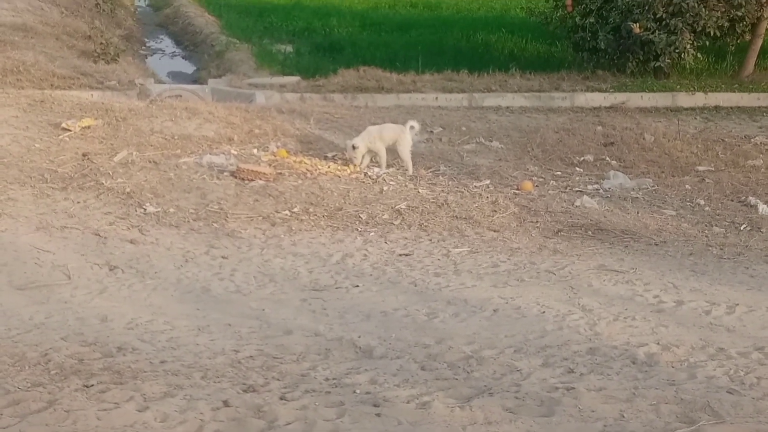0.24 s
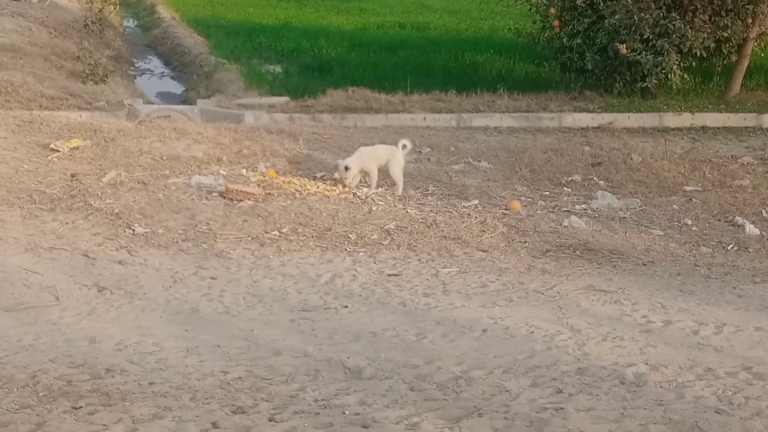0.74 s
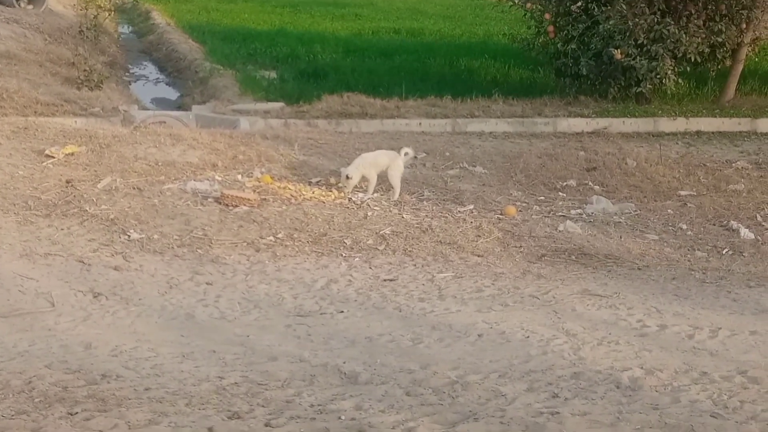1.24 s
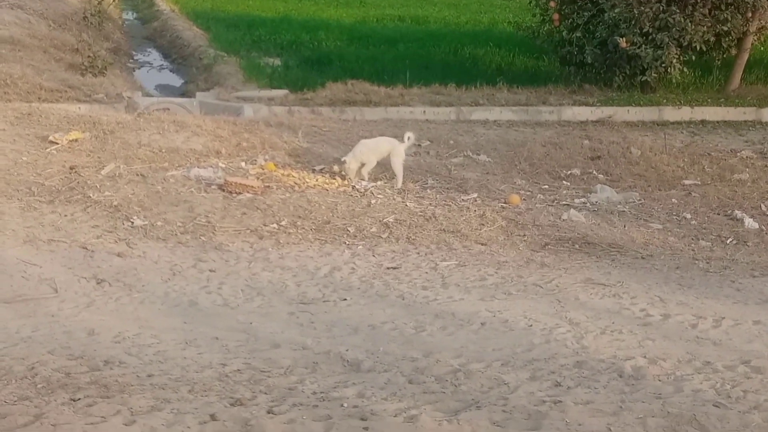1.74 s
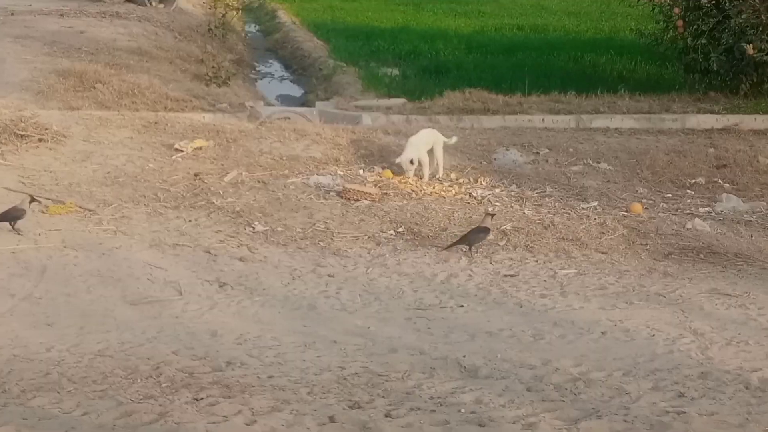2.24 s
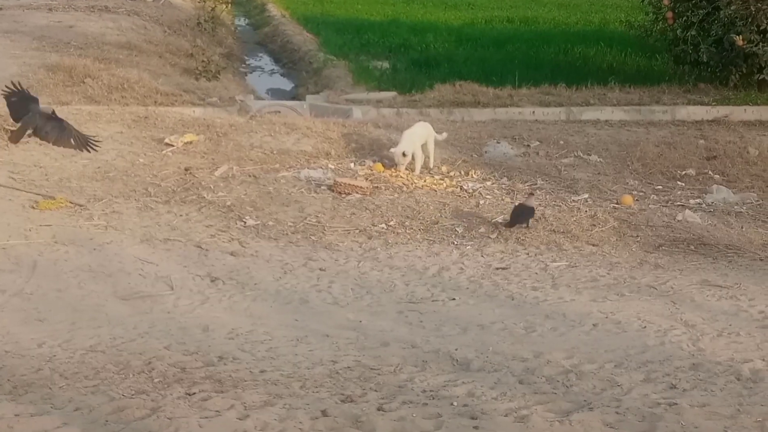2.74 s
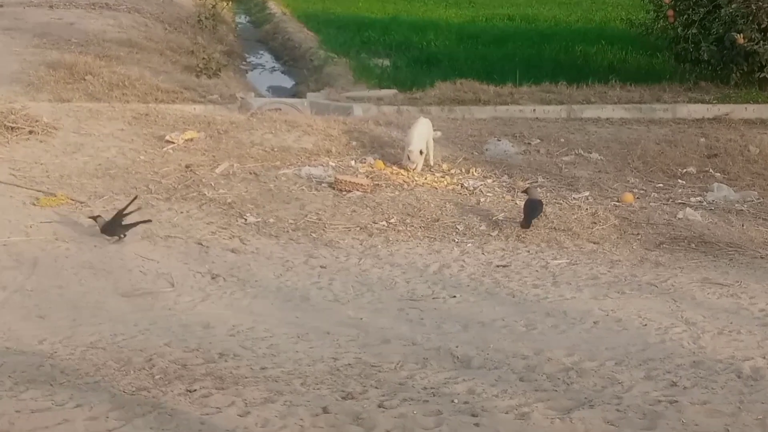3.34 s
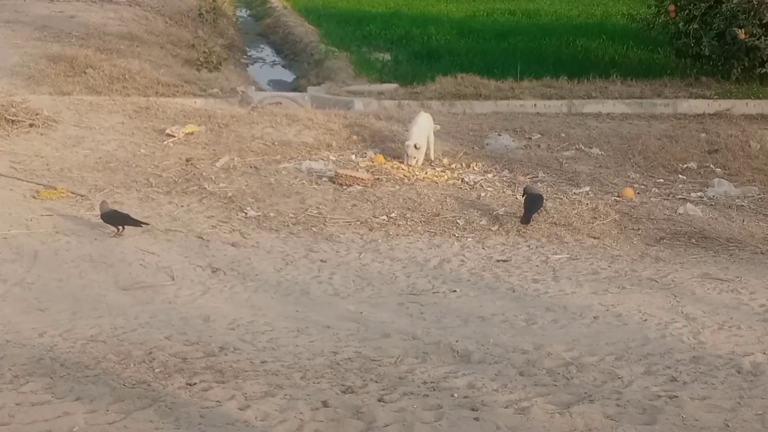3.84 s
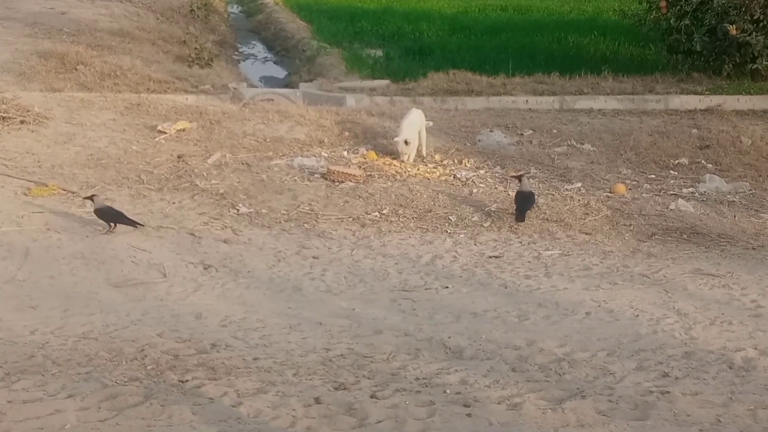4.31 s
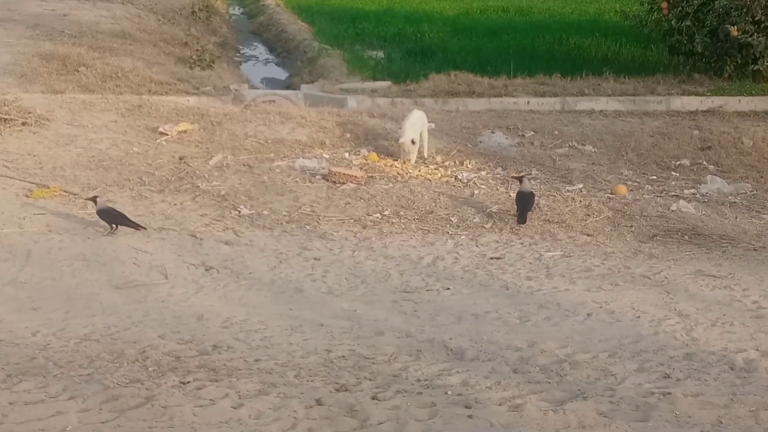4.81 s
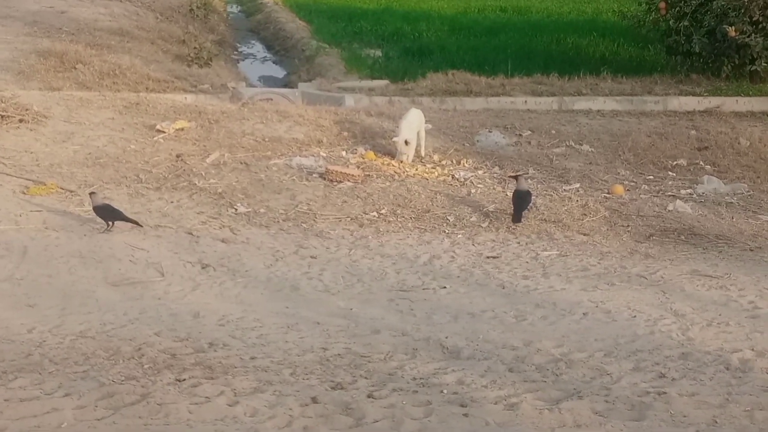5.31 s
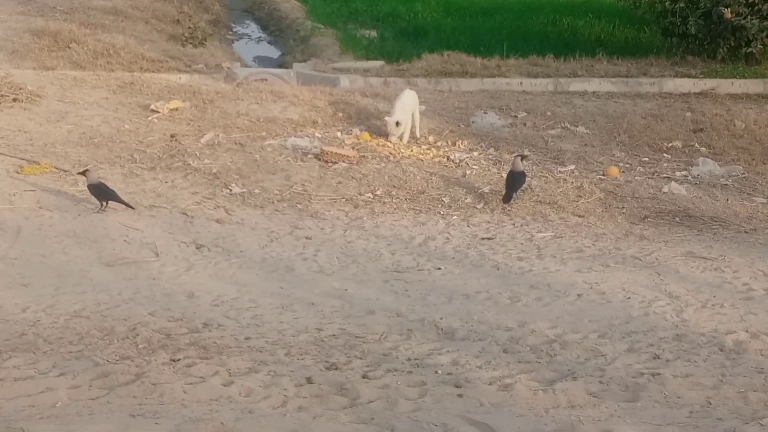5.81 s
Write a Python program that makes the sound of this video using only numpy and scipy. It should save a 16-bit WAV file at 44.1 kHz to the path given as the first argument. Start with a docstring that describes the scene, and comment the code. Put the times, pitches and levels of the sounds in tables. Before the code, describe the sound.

Handheld outdoor microphone near a field. A one-cylinder pump engine beats rapidly in the distance under unsteady airy hiss, with quick bright chirps, faint crows and a rough near caw. A second near caw stops abruptly at two seconds as the background jumps. Afterwards come dry ticks, soft wing flutters, faraway caws, a continuous fast trill, short harsh squawks and warbles, with low wind thuds strongest from three to about four and a half seconds.

```python
"""Distant crows caw and small birds chirp over an engine's thump and clank; soon a crow caws close by.
After two seconds the scene jumps to a later moment, cutting a close caw short: gusts buffet the
microphone and a thin trill sets in. Rattling membrane pulses through resonances make the caws, gliding
sine tones the chirps, warbles and trills, filtered clicks and noise bursts the one-cylinder pump engine,
and shaped noise the wind, the open air, breathy hiss, a low growl, wing beats, scuffs and ticks."""
import sys
import numpy as np
from scipy import signal
from scipy.fft import rfft, irfft, next_fast_len
from scipy.io import wavfile
from scipy.ndimage import uniform_filter1d

SR = 44100
rng = np.random.default_rng(int(sys.argv[2]) if len(sys.argv) > 2 else 0)


def transcribe(signal):
    """Save signal, clipped to [-1, 1], as a 16-bit WAV file at the path in sys.argv[1]."""
    frames = np.atleast_2d(signal).T
    limited = np.clip(frames, -1, 1)
    pcm = np.round(limited * 32767).astype(np.int16)
    wavfile.write(sys.argv[1], SR, pcm)


N = 267246
T = np.arange(N) / SR   # seconds
JUMP_S = 2.044   # the later moment begins
BIRD_T60_S = .17   # the scattered tail of the small birds falls by 60 dB in this time
NEAR_TREMOR, FAR_TREMOR = .015, .03   # random pitch wander of near and far chirps, as a share of the pitch


def from_db(db):
    """Amplitude gain is ten to the power of a twentieth of the decibels."""
    return 10 ** (np.asarray(db) / 20)


def rms_one(x):
    """Normalization: dividing by the root mean square gives unit power."""
    return x / np.sqrt(np.mean(x ** 2) + 1e-20)


def along(rows, t):
    """Linear interpolation: the columns of a curve table at times t."""
    s, *columns = np.transpose(rows)
    return [np.interp(t, s, c) for c in columns]


def span(start, end):
    """Sampling: the indices between two times in seconds."""
    return np.arange(max(int(start * SR), 0), min(int(end * SR), N))


def colour(x, points):
    """Spectral shaping: multiply the spectrum by a curve of (Hz, dB) points, then set unit power."""
    size = next_fast_len(len(x) + 2048)
    hz, db = np.transpose(points)
    f = np.arange(size // 2 + 1) * SR / size + 1
    skirts = np.minimum(f / hz[0], 1) ** 2 * np.minimum(hz[-1] / f, 1) ** 2   # 12 dB an octave
    curve = from_db(np.interp(np.log(f), np.log(hz), db))
    shaped = irfft(rfft(x, size) * skirts * curve, size)
    return rms_one(shaped[:len(x)])


def drift(t, rate):
    """Band-limited randomness: straight lines join about rate random values a second."""
    knots = rng.standard_normal(int((t[-1] - t[0]) * rate) + 2)
    return np.interp((t - t[0]) * rate, np.arange(len(knots)), knots)


def resonate(x, hz, width_hz):
    """Resonance: a pole pair rings near hz with about unit gain at its peak."""
    r = np.exp(-np.pi * width_hz / SR)
    zeros = np.array([1, 0, -1]) * (1 - r * r) / 2
    poles = [1, -2 * r * np.cos(2 * np.pi * hz / SR), r * r]
    return signal.lfilter(zeros, poles, x + 1e-18)


def delayed(x, s):
    """Propagation delay: the same sound s seconds later."""
    return np.interp(T - s, T, x, left=0)


def fade(t, edge_s):
    """Windowing: smooth edges of edge_s open and close a sound."""
    return np.sin(np.pi / 2 * np.clip(np.minimum(t - t[0], t[-1] - t) / edge_s, 0, 1)) ** 2


def effort(t, peak_share):
    """Breath effort: an arch from 0 to 1 and back, highest at peak_share of the way."""
    peak_s = t[0] + np.clip(peak_share, .05, .95) * (t[-1] - t[0])
    u = np.interp(t, [t[0], peak_s, t[-1]], [-1, 0, 1])
    return 1 - u ** 2


def syrinx(t, pitch_hz, jitter, rasp, rattle_db, lurch):
    """Subharmonics: membrane pulses lurch and swell in a five-cycle rattle, with turbulence in each opening."""
    cycles = np.cumsum(pitch_hz * (1 + jitter * drift(t, 150))) / SR
    turn = 2 * np.pi * cycles / 5
    cycles = cycles + np.clip(lurch, 0, .7) * np.sin(turn + drift(t, 6))
    pulses = rms_one(np.diff(np.floor(cycles), prepend=np.floor(cycles[0])))
    opening = 1 + np.cos(2 * np.pi * cycles)
    turbulence = rms_one(rng.standard_normal(len(t)) * opening)
    rattle = from_db(rattle_db * (np.cos(turn) + 0.2 * drift(t, 200)))
    return (pulses + rasp * turbulence) * rattle


def whistle(t, hz, tremor=.014, flicker_db=2.06):
    """Frequency modulation: a sine follows hz with a slight tremor while its level flickers."""
    turns = np.cumsum(hz * (1 + tremor * drift(t, 700))) / SR
    flicker = from_db(flicker_db * drift(t, 400))
    return np.sqrt(2) * np.sin(2 * np.pi * turns) * flicker * fade(t, 0.00067)


def outdoors(x, wet_db, t60):
    """Diffuse scattering: trees and banks return a short, exponentially dying tail."""
    t = T[:SR // 2]
    tail = rng.standard_normal(len(t)) * from_db(-60 * t / t60) * (t > .006)
    return x + from_db(wet_db) * signal.fftconvolve(x, tail / np.linalg.norm(tail))[:N]


def mottled(x, depth_db):
    """Random amplitude modulation: each narrow band swells and sinks several times a second."""
    _, _, bands = signal.stft(x, SR, nperseg=1024)
    swell = uniform_filter1d(rng.standard_normal(bands.shape), size=7, axis=1)   # smooth in time
    swell = uniform_filter1d(swell, size=4, axis=0)   # and across neighbouring bands
    return signal.istft(bands * from_db(depth_db * rms_one(swell)), SR)[1][:N]


def far_crows(sag=.24, beak_sag=.1, early_overtone_db=-3, late_overtone_db=-13):
    """Source and filter: distant caws keep mostly the beak resonance; pitch and beak sag toward the end."""
    # Distant caws. Each row: start in seconds, length in seconds, top pitch before the sag in Hz,
    # beak resonance midway through its sag in Hz, relative level in dB.
    distant_caws = [(.0, 0.45, 486, 1940, -60), (0.222, 0.35, 493.8, 1780, -54.5),
                    (1.272, 0.27, 397.6, 1950, -53), (1.962, 0.19, 501, 1760, -57.5),
                    (1.997, 0.15, 335, 1010, -68), (2.247, 0.13, 251.5, 955, -69),
                    (2.356, 0.29, 449.3, 1756, -56.5), (2.42, 0.4, 412, 820, -72),
                    (3.198, 0.33, 445.7, 1720, -63), (3.417, 0.26, 460.4, 1720, -61.5),
                    (3.885, 0.34, 469, 1790, -59), (4.303, 0.3, 413.6, 1520, -65.5),
                    (4.648, .19, 566.6, 1950, -58.5), (4.812, .22, 398, 1620, -58.5),
                    (5.164, 0.12, 440, 1730, -70), (5.44, 0.39, 432, 1680, -62),
                    (5.653, 0.19, 293.5, 1080, -65), (5.938, 0.14, 360.6, 1443, -65.5)]
    overtone_colour = [(700, -8.5), (1000, 8.5), (3200, 6.0), (4000, 2.5), (5200, 5), (7500, -14.5)]   # Hz, dB
    out = np.zeros(N)
    for start, length, pitch_hz, beak_hz, db in distant_caws:
        i = span(start, start + length)
        u = (T[i] - start) / length
        sagging_hz = pitch_hz * (1 - sag * (u - .15) ** 2)
        voice = syrinx(T[i], sagging_hz, jitter=.01, rasp=.12, rattle_db=2.8, lurch=.05)
        beak = rms_one(resonate(resonate(voice, beak_hz, 430), beak_hz, 560))
        overtones = colour(voice, overtone_colour)
        overtone_db = early_overtone_db if start + length < JUMP_S else late_overtone_db
        # a slowing pace lowers pitch and resonance together
        pace = 1 - beak_sag * (u ** 2 - np.mean(u ** 2))
        caw = np.interp(np.cumsum(pace), np.arange(len(i)), beak + from_db(overtone_db) * overtones)
        out[i] += caw * from_db(db) * fade(T[i], 0.26 * length)
    return out


def firings(offset_s, spread_db):
    """Periodic excitation: one click each engine cycle, offset_s from the firing, of varying strength."""
    cycle_s, early_firing_s, late_firing_s = .085, .048, 2.083   # one firing falls on each of the two times
    cycles = (T - np.where(T < JUMP_S, early_firing_s, late_firing_s) - offset_s) / cycle_s
    return (np.diff(cycles % 1, prepend=0) < -.5) * from_db(spread_db * drift(T, 31))


def engine(early_db=-51.5, late_db=-48, rumble_db=-56, late_rumble_db=-52, early_clank_db=-6):
    """Filtered impulses: dull exhaust beats over their own rumble, and ringing clanks in every cycle."""
    # Exhaust beat and the lesser puffs round it. Each row: seconds from firing, relative level in dB.
    thumps = [(-.022, 0), (-.01, -9.5), (0, 2.5), (.009, -1), (.021, -13.5)]
    # Clanks of the engine. Each row: seconds from firing, resonance in Hz, width in Hz, relative level in dB.
    clanks = [(-.029, 1602, 130, -70), (-.029, 1814, 130, -69), (-.011, 1700, 300, -70),
              (-.008, 1178, 90, -70)]
    rumble_colour = [(20, -32), (35, -11.5), (55, 1.5), (95, -2), (150, -7.5), (210, -32.0), (330, -31.0)]   # Hz, dB
    early = T < JUMP_S
    beats = sum(from_db(db) * firings(s, 2.8) for s, db in thumps)
    beats = signal.sosfilt(signal.butter(2, [62, 165], "band", fs=SR, output="sos"), beats)
    beats = rms_one(signal.sosfilt(signal.butter(6, 165, fs=SR, output="sos"), beats))
    rumble = colour(rng.standard_normal(N), rumble_colour)
    out = beats * from_db(np.where(early, early_db, late_db))
    out += rumble * from_db(np.where(early, rumble_db, late_rumble_db))
    for offset_s, hz, width_hz, db in clanks:
        # each click starts a noise burst with an 8.3 ms decay
        burst = signal.lfilter([1], [1, -np.exp(-1 / (0.0083 * SR))], firings(offset_s, 3.3) + 1e-18)
        chatter = burst * rng.standard_normal(N)
        clank = resonate(resonate(chatter, hz, width_hz), hz, 3 * width_hz)
        out += rms_one(clank) * from_db(db + np.where(early, early_clank_db, 0))
    return out


def air(early_murmur_db=0.5, late_murmur_db=3.0, early_hiss_db=5.0, late_hiss_db=0.0):
    """Broadband noise: the far murmur of the countryside and a hiss of leaves, both unsteady."""
    # Open air before the jump, in two stretches, and after it.
    # Each row: time in seconds, relative murmur level in dB, relative hiss level in dB.
    early_levels = [
        [(0.0, -65.5, -62), (0.182, -62, -62), (0.4, -64.5, -69.5)],
        [(0.88, -60, -63), (1.074, -69, -73.5), (1.686, -68, -70.5), (1.91, -63.5, -70), (2.03, -54.5, -66.5)],
    ]
    late_levels = [(2.08, -78.5, -79.5), (2.38, -70.5, -76), (2.71, -78.5, -65.5), (3.37, -74.5, -79.5),
                   (4.16, -72, -72.5), (4.68, -75, -74), (5.22, -75.5, -66), (5.65, -72.5, -69),
                   (6.06, -78.5, -71)]
    # Spectra of the murmur and of the hiss before and after the jump. Each row: frequency in Hz, level in dB.
    murmur_colour = [(250, -13), (500, 2), (800, 7), (1000, 2), (1300, 8), (1900, 7), (2700, -3.5),
                     (4000, -14.5)]
    early_hiss_colour = [(1500, -21), (3000, 3.5), (4500, 9.5), (6000, 6), (7500, 2.5), (9500, -4.5),
                         (12500, -27), (14000, -19.5), (15500, -11.5)]
    late_hiss_colour = [(1500, -27.5), (2800, 1.5), (3700, 10.5), (4700, 1), (6200, 6.5), (7500, -5),
                        (9500, -19.5), (13500, -22), (15300, -10.5)]
    murmur, hiss = along(np.vstack([*early_levels, late_levels]), T)
    early = colour(rng.standard_normal(N), early_hiss_colour) * from_db(early_hiss_db)
    late = colour(rng.standard_normal(N), late_hiss_colour) * from_db(late_hiss_db)
    leaves = np.where(T < JUMP_S, early, late) * from_db(hiss + 4.9 * drift(T, 40))
    murmur_db = murmur + np.where(T < JUMP_S, early_murmur_db, late_murmur_db)
    far = colour(rng.standard_normal(N), murmur_colour) * from_db(murmur_db + 2.8 * drift(T, 25))
    return mottled(leaves + far, depth_db=4.0)


def chirps(near_wet_db=-7.0, far_wet_db=0.0, far_loss_db=-3.0):
    """Gliding tones: chirps bend through three pitches, loudest in the middle; faint ones echo most."""
    # Whistled chirps. Each row: middle in seconds, length in seconds, start, middle and end pitch in Hz,
    # relative level in dB, second voice as a multiple of the pitch or 0 for none.
    chirp_rows = [(0.075, 0.028, 6070, 6320, 7360, -41.5, 0), (0.104, 0.05, 3470, 6050, 3720, -36.5, 0),
                  (0.188, 0.065, 3170, 4600, 5570, -48, 0), (.39, 0.037, 3750, 3200, 2750, -63, 0),
                  (0.912, 0.017, 5200, 5860, 6940, -42.5, 0), (0.933, 0.04, 3080, 4740, 3550, -38, 0),
                  (0.947, 0.032, 3590, 2546, 2640, -53, 0), (0.961, 0.017, 2940, 4480, 3200, -42, 0),
                  (1.003, 0.047, 3220, 4210, 2850, -44.5, 0), (1.175, 0.068, 3900, 3260, 3530, -56.5, 0),
                  (1.273, 0.043, 3570, 4320, 3450, -55, 0), (1.493, .016, 3830, 4070, 4500, -45, 0),
                  (1.512, .034, 4920, 5870, 4880, -30, 0), (1.534, 0.019, 5150, 4690, 4670, -36.5, 0),
                  (1.593, 0.071, 5130, 5150, 5260, -52.5, 0), (1.615, .08, 3800, 2800, 2430, -68, 0),
                  (1.87, .032, 3000, 4140, 2550, -48.5, 0), (1.888, .024, 2650, 2610, 2500, -52.5, 0),
                  (1.925, 0.053, 2165, 2214, 2200, -54.5, 0), (2.412, 0.071, 6820, 5760, 5110, -51.5, 1.14),
                  (2.847, .045, 2040, 2950, 4200, -68, 0), (2.973, .07, 4150, 3845, 3550, -61, 0),
                  (3.08, 0.066, 4250, 3940, 3710, -62, 0), (3.15, .04, 3950, 3670, 3460, -63.5, 0),
                  (3.319, 0.031, 7100, 6350, 5930, -51.5, 0), (3.438, 0.038, 8200, 6360, 4900, -49, 0),
                  (3.464, .032, 8100, 6430, 5550, -51, 0), (3.856, 0.02, 4170, 4400, 4400, -45, 0),
                  (3.885, 0.037, 4020, 3790, 2990, -39.5, 0), (3.91, .02, 3120, 3090, 3200, -48.5, 0),
                  (4.075, 0.17, 2750, 2550, 2400, -63.5, 0), (4.152, 0.038, 3440, 3320, 3170, -54.5, 0),
                  (4.211, 0.069, 5770, 6860, 5430, -54.5, 1.2), (4.44, .034, 4300, 3930, 3640, -64, 0),
                  (4.699, 0.033, 3920, 3620, 3180, -56, 0), (4.72, .14, 2900, 2300, 2030, -59.5, 0),
                  (5.19, .042, 3944, 3970, 3450, -41, 0), (5.2, 0.061, 3260, 3280, 2964, -44.5, 0),
                  (5.263, 0.042, 6100, 6480, 4850, -39.5, 1.15), (5.37, 0.042, 2780, 4050, 2450, -53.5, 0),
                  (5.387, 0.019, 2500, 2500, 2440, -54, 0), (5.426, 0.06, 2180, 2093, 2110, -53, 0)]
    edge_db, second_voice_db = -12.5, -14
    ease = .5   # how far the glide levels off at both ends, 0 to 1
    far_below_db = -54.5   # fainter chirps count as distant
    near, far = np.zeros((2, N))
    for s, length, start_hz, middle_hz, end_hz, db, second in chirp_rows:
        i = span(s - length / 2, s + length / 2)
        u = np.linspace(-1, 1, len(i))
        bend = u + ease * (np.sin(np.pi / 2 * u) - u)
        parabola = np.polyfit([-1, 0, 1], [start_hz, middle_hz, end_hz], 2)
        hz = np.polyval(parabola, bend)
        distant = db < far_below_db
        voice = whistle(T[i], hz, FAR_TREMOR if distant else NEAR_TREMOR)
        if second:
            voice = voice + from_db(second_voice_db) * whistle(T[i], second * hz)
        layer = far if distant else near
        layer[i] += voice * from_db(db + edge_db * u ** 2)
    near = outdoors(near, near_wet_db, BIRD_T60_S)
    far = outdoors(far + far_birds(), far_wet_db, BIRD_T60_S)
    return near + from_db(far_loss_db) * far


def near_crow():
    """Source, filter and comb: hoarse arching caws; rough ground smears each pulse, its bounce combs."""
    # Close caws. Each row: start in seconds, length in seconds, top pitch in Hz, relative level in dB.
    close_caws = [(.425, .425, 389.6, -36), (1.958, .36, 409.7, -41)]
    # Throat and beak of a close crow. Each row: frequency in Hz, level in dB.
    throat = [(350, -47), (600, -20.5), (780, -1), (1060, -11.5), (1350, -2), (1850, -2), (2200, 1),
              (2650, -9), (3200, -17.5), (4100, -10.5), (4900, -0.5), (5900, -15), (7500, -10.5),
              (10000, -21.5), (13000, -42.5)]
    # a caw swells quickly and ebbs slowly; pitch and level follow this effort
    peak_share, pitch_drop, level_drop_db, edge_s = .42, .32, 10, 0.034
    gullet_hz, gullet_width_hz, gullet_db = 545, 180, -13   # low resonance while the beak is nearly shut
    beak_hz, beak_width_hz, beak_open_db = 2350, 170, 0.5   # this resonance grows as the beak opens
    out = np.zeros(N)
    t = T[:int(.012 * SR)]
    for start, length, top_hz, db in close_caws:
        i = span(start, start + length)
        slack = 1 - effort(T[i], peak_share)
        pitch_hz = top_hz * (1 - pitch_drop * slack)
        voice = syrinx(T[i], pitch_hz, jitter=.011, rasp=.22, rattle_db=3.3, lurch=.55)
        scatter = rng.standard_normal(len(t)) * fade(t, .004)
        smear = irfft(np.exp(1j * np.angle(rfft(scatter))))   # delays each frequency differently, colours none
        voice = signal.fftconvolve(voice, smear, "same")
        gullet = resonate(voice, gullet_hz, gullet_width_hz)
        gullet = rms_one(resonate(gullet, gullet_hz, gullet_width_hz))
        voice = colour(voice, throat) + from_db(gullet_db) * slack * gullet
        beak = resonate(voice, beak_hz, beak_width_hz)
        voice = voice + from_db(beak_open_db) * (1 - slack) ** 3 * beak
        out[i] += voice * from_db(db - level_drop_db * slack) * fade(T[i], edge_s)
    out = .85 * out + .4 * delayed(out, .0023)   # the bounce arrives 2.3 ms later
    return outdoors(out, wet_db=-15, t60=.2)


def swishes_and_ticks(tick_db=-10, tick_s=0.009):
    """Noise bursts: resonant grainy noise for hiss, growl, wings and scuffs; exponential decay for dry ticks."""
    # Breathy hiss over a distant caw, a low growl, and wing beats and scuffs.
    # Each row: middle in seconds, length in seconds, resonance in Hz, relative level in dB.
    swishes = [(1.398, 0.38, 5500, -58.5), (1.821, 0.16, 1200, -58.5), (1.87, .34, 508, -65.5),
               (1.923, 0.096, 1140, -53), (1.932, 0.045, 6740, -63), (2.604, 0.12, 5500, -61.5),
               (2.734, 0.086, 4170, -67), (2.85, 0.085, 4070, -61)]
    # Dry ticks of grit and twigs. Each row: time of peak in seconds, relative level in dB.
    tick_rows = [(1.912, -42.5), (2.5182, -50), (2.5536, -55), (2.61, -43), (2.7194, -58), (2.7744, -58),
                 (2.8444, -56), (3.3225, -42.5), (4.039, -44), (4.4346, -58), (5.6145, -56)]
    # Spectrum of the ticks. Each row: frequency in Hz, level in dB.
    tick_colour = [(1500, -19.5), (4000, 3.5), (7500, 3), (10000, -4.5), (13000, -15.5), (15500, -3.5)]
    tick_rise_s = 0.0045
    out, ticks = np.zeros(N), np.zeros(N)
    for s, length, hz, db in swishes:
        i = span(s - length / 2, s + length / 2)
        grains = rng.standard_normal(len(i)) * from_db(3.1 * drift(T[i], 610))
        burst = rms_one(resonate(resonate(grains, hz, 0.2 * hz), hz, 0.45 * hz))
        out[i] += burst * from_db(db) * fade(T[i], 0.37 * length)
    for s, db in tick_rows:
        i = span(s - .02, s + 0.035)
        ticks[i] += from_db(db + tick_db) * np.exp(np.minimum((T[i] - s) / tick_rise_s, (s - T[i]) / tick_s))
    return out + ticks * colour(rng.standard_normal(N), tick_colour)


def wind(gust_db=0.5, calm_db=-48, flutter_db=-17):
    """Turbulent pressure: eddies make lumpy bass that brightens in strong gusts, and single buffets."""
    # Wind on the microphone: a light puff, long gusts and their aftermath.
    # Each row: time in seconds, relative level in dB before the calm power is taken off.
    gusts = [(2.1, -50.0), (2.5, -42), (2.8, -52), (3.15, -48.5), (3.25, -32), (3.5, -35.5), (3.66, -34.5),
             (3.82, -36.5), (3.88, -49), (3.95, -41.5), (4.02, -49), (4.09, -29.5), (4.22, -35),
             (4.38, -36.5), (4.5, -44), (4.76, -38.5), (4.95, -46), (5.07, -41), (5.16, -48.0),
             (6.06, -47.5)]
    # Spectrum of the eddies. Each row: frequency in Hz, level in dB.
    wind_colour = [(20, -25), (40, -21), (65, 5.5), (110, 4), (160, -5.5), (220, -12.5), (320, -38.5),
                   (500, -66), (900, -78.5)]
    # Single buffets. Each row: time in seconds, relative level in dB, frequency in Hz.
    buffets = [(3.261, -20, 85), (3.415, -23, 128), (3.529, -26.5, 129), (3.573, -21.5, 196.6),
               (3.627, -17, 131), (3.647, -23, 184), (3.801, -30, 194), (4.095, -20, 131),
               (4.098, -31, 344), (4.15, -26, 252), (4.186, -18, 135), (4.314, -19.5, 80),
               (4.543, -21, 73.6), (4.738, -26.5, 176), (5.389, -29.5, 74.6)]
    flutter_colour = [(130, -33), (230, 9.5), (350, 0.5), (520, -14.0), (900, -49.5)]   # Hz, dB
    level, = along(gusts, T)
    gust_power = np.maximum(from_db(level) ** 2 - from_db(calm_db) ** 2, 0)
    strength = np.sqrt(gust_power) * (T > JUMP_S)
    eddies = colour(rng.standard_normal(N), wind_colour)
    eddies /= np.sqrt(uniform_filter1d(eddies ** 2, size=3500))   # even out the level over 79 ms
    flutter = colour(rng.standard_normal(N), flutter_colour) * from_db(4.2 * drift(T, 45))
    brightness = from_db(flutter_db) * strength / strength.max()
    out = strength * (from_db(gust_db) * eddies + brightness * flutter)
    for s, db, hz in buffets:
        i = span(s - .04, s + .04)
        turns = (T[i] - s) * hz
        out[i] -= from_db(db) * np.sin(2 * np.pi * turns) * np.exp(-(turns / 0.62) ** 2)
    return signal.sosfilt(signal.butter(2, 28, "high", fs=SR, output="sos"), out)


def trills():
    """Repeated frequency sweeps: each pulse of a trill swells and dies while it sweeps downward."""
    # Runs of short sweeps that creep up in pitch. Each row: mid-sweep pitch at the start and at the end in Hz,
    # relative level in dB, swell in seconds, fade in seconds.
    trill_rows = [(5520, 5970, -57, 1, 0.029), (5730, 6080, -55.5, 0.054, 1)]
    # Pace, one list for each trill. Each row: time in seconds, sweeps per second.
    paces = [
        [(2.815, 34), (3.8, 34), (4.5, 33.4), (5.2, 31.6), (6.07, 30.6)],
        [(4.4, 32), (6.07, 32)],
    ]
    edge_db = -14   # added level at the start and the end
    out = np.zeros(N)
    for (start_hz, end_hz, db, swell_s, fade_s), pace in zip(trill_rows, paces):
        start, end = pace[0][0], pace[-1][0]
        i = span(start, end)
        rate, = along(pace, T[i])
        u = (np.cumsum(rate) / SR + .5) % 1 - .5   # place within the sweep, 0 at its loudest
        sweep_hz = np.linspace(start_hz, end_hz, len(i)) - 1150 * u - 900 * u ** 2
        tone = np.sqrt(2) * np.sin(2 * np.pi * np.cumsum(sweep_hz) / SR)
        slack = 1 - np.clip(np.minimum((T[i] - start) / swell_s, (end - T[i]) / fade_s), 0, 1)
        gain = from_db(db + edge_db * slack ** 2 + drift(T[i], 27))
        out[i] += tone * np.exp(-(u / 0.2) ** 2) * gain
    return out


def far_birds(spread_db=3.0, pitch_spread=0.044):
    """Random frequency modulation: faint sparrow-like chirps waver and slide down at uneven intervals."""
    from_s, gap_s, length_s = 3.5, 0.26, 0.07   # gap and length are typical values
    middle_hz, slide, level_db = 3740, 0.14, -67.5   # typical pitch, share of pitch lost, relative level
    out = np.zeros(N)
    quirks = np.clip(rng.standard_normal((13, 4)), -2, 2)   # one row for each chirp
    for k, (lag, size, pitch, strength) in enumerate(quirks):
        start = min(from_s + gap_s * (k + lag / 4), T[-1] - length_s)
        i = span(start, start + length_s * np.exp(size / 4))
        descent = slide * np.linspace(-.5, .5, len(i))
        glide = 1 + pitch_spread * pitch - descent + .04 * drift(T[i], 250)
        voice = whistle(T[i], middle_hz * glide, FAR_TREMOR)
        out[i] += voice * from_db(level_db + spread_db * strength) * effort(T[i], 0.54)
    return out


def squawks():
    """Source and filter: short harsh calls of small birds; pitch and level follow one push of effort."""
    # Harsh squawks. Each row: start in seconds, length in seconds, top pitch in Hz, relative level in dB.
    squawk_rows = [(3.819, .085, 643, -44.5), (5.152, 0.056, 649, -42.5)]
    # Spectrum of the squawks. Each row: frequency in Hz, level in dB.
    squawk_colour = [(2300, -50), (3100, 1), (4000, 2.5), (5100, 7), (6300, -1), (7700, -11.5),
                     (9000, -32.5), (11000, -52)]
    peak_share, pitch_drop, level_drop_db = .33, .1, 14
    out = np.zeros(N)
    for start, length, top_hz, db in squawk_rows:
        i = span(start, start + length)
        slack = 1 - effort(T[i], peak_share)
        pitch_hz = top_hz * (1 - pitch_drop * slack)
        voice = syrinx(T[i], pitch_hz, jitter=0.06, rasp=0.23, rattle_db=0.5, lurch=0.012)
        out[i] += colour(voice, squawk_colour) * from_db(db - level_drop_db * slack) * fade(T[i], 0.0097)
    return out


def warbles():
    """Periodic frequency modulation: whistles swing quickly up and down while they fade."""
    # Fast warbles. Each row: start in seconds, length in seconds, start and end pitch in Hz,
    # swing at the start in Hz (it halves by the end), relative level at the start in dB.
    warble_rows = [(4.19, .11, 3060, 3850, 170, -50.5), (5.279, 0.098, 5850, 5320, 866, -45)]
    swings_per_s, loss_db = 65, 17
    out = np.zeros(N)
    for start, length, start_hz, end_hz, swing_hz, db in warble_rows:
        i = span(start, start + length)
        u = np.linspace(0, 1, len(i))
        swing = swing_hz * (1 - u / 2) * np.cos(2 * np.pi * swings_per_s * (T[i] - start))
        hz = start_hz + (end_hz - start_hz) * u - swing
        out[i] += whistle(T[i], hz) * from_db(db - loss_db * u)
    return out


def scene():
    """Superposition: all sources add at one microphone; the jump cuts off the near crow."""
    crows = near_crow() * (T < JUMP_S) + outdoors(far_crows(), wet_db=-9, t60=0.14)
    birds = chirps()
    birds += outdoors(warbles() + squawks(), wet_db=-7.0, t60=BIRD_T60_S)
    birds += outdoors(trills(), wet_db=-9.5, t60=BIRD_T60_S)
    return (crows + birds + engine() + wind() + air() + swishes_and_ticks())[None]


def record(dry):
    """Band limiting: a steep elliptic low-pass removes the top above 15.8 kHz."""
    return signal.sosfilt(signal.ellip(10, .2, 70, 15800, fs=SR, output="sos"), dry)


dry = scene()
out = record(dry)
transcribe(out)
```